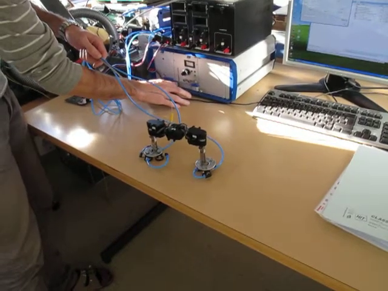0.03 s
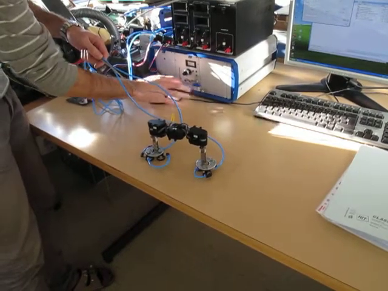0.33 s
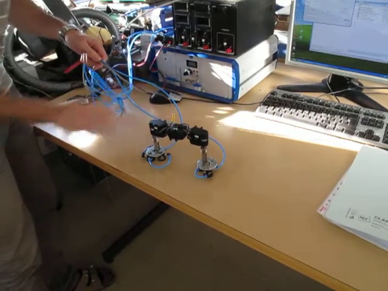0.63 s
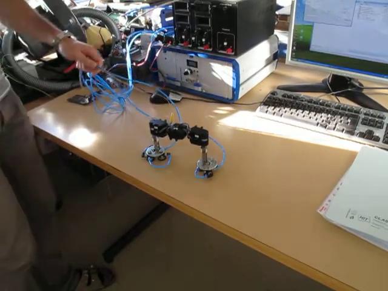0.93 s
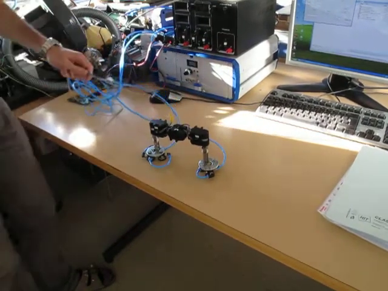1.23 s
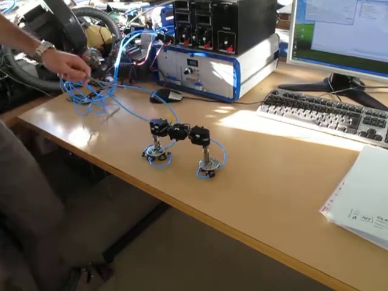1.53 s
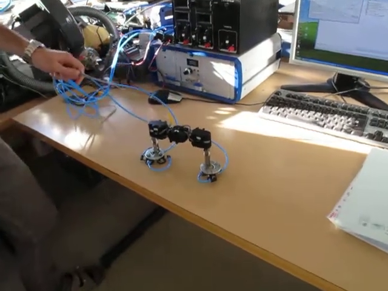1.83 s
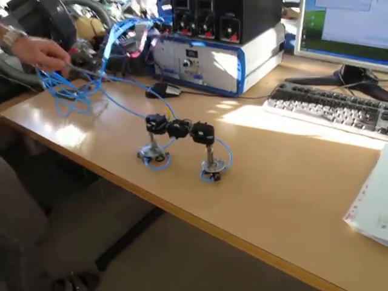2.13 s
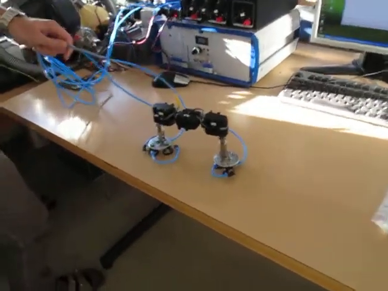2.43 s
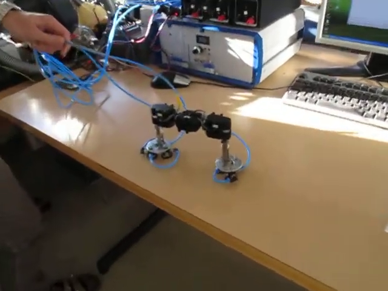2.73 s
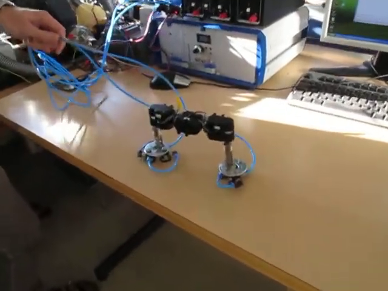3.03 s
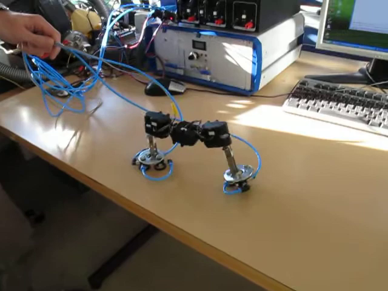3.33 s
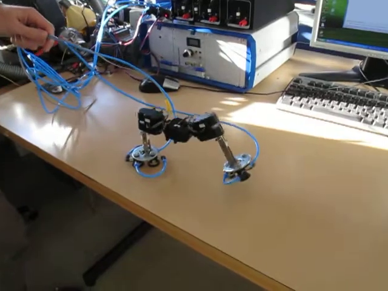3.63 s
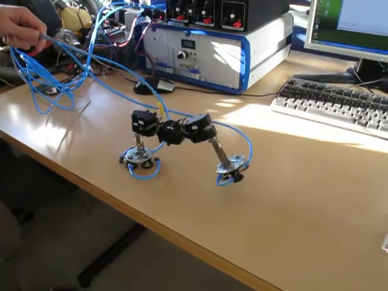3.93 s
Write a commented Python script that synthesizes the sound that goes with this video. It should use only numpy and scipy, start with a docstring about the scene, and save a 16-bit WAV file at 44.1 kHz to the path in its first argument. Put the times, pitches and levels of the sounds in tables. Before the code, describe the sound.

The steady, humming drone of a small vacuum pump fills a workroom, along with a high, whistling air hiss. A soft rustle comes first, then one small valve click. The pump's tones fade and return as the microphone drifts.

```python
"""A small vacuum pump drones steadily in a workroom while air hisses and whistles through a narrow leak.
The pump's spinning vanes make a stack of tones. The microphone drifts through the room's standing
waves (fixed loud and quiet spots), so these tones fade and return one by one. Something rustles softly,
a valve clicks once, and late on a brief audio dropout makes the tones jump, with a faint thump."""
import sys
import numpy as np
from scipy import signal
from scipy.fft import rfft, irfft
from scipy.io import wavfile
from scipy.ndimage import uniform_filter1d

SR = 44100
rng = np.random.default_rng(int(sys.argv[2]) if len(sys.argv) > 2 else 0)


def wav_out(sig):
    """Save sig, one row per channel (or a flat mono array), as 16-bit PCM at SR to the path in sys.argv[1]."""
    wavfile.write(sys.argv[1], SR, np.round(np.clip(np.atleast_2d(sig).T, -1, 1) * 32767).astype(np.int16))


N = 176400
T = np.arange(N) / SR
HZ = np.fft.rfftfreq(N, 1 / SR)
VANE_HZ, VANE_COUNT = 230.45, 5  # vanes passing per second, vanes on the shaft
DROPOUT_S = 3.4235


def amp(db):
    """Turns decibels into a gain."""
    return 10 ** (np.asarray(db) / 20)


def unit(x):
    """Scales a signal to an average (rms) level of 1."""
    return x / np.sqrt(np.mean(abs(x) ** 2) + 1e-20)


def bell(at_s, half_s):
    """A smooth rise to 1 at at_s, then a fall."""
    return np.exp(-((T - at_s) / half_s) ** 2)


def level_at(spectrum, hz):
    """Looks up a level between a table's pitches, on a log scale."""
    pitches, levels = np.transpose(spectrum)
    return np.interp(np.log(hz + 1), np.log(pitches + 1), levels)


def drift(rate_hz):
    """A smooth random wobble, up to about rate_hz."""
    return unit(irfft(rfft(rng.standard_normal(N)) * np.exp(-(HZ / rate_hz) ** 2), N))


def noise(spectrum, patchy_db=0):
    """Shaped noise; patchy_db makes its narrow bands swell and sink."""
    hz = np.fft.rfftfreq(1024, 1 / SR)
    real, imag, patches = rng.standard_normal((N // 256 + 5, len(hz), 3)).T
    patches = uniform_filter1d(patches, size=5, axis=0)  # smooth across pitch
    patches = unit(uniform_filter1d(patches, size=90, axis=1))  # and across time
    bands = (real + 1j * imag) * amp(level_at(spectrum, hz)[:, None] + patchy_db * patches)
    return unit(signal.istft(bands, nperseg=1024, noverlap=768)[1][:N])


def ringing_noise(hz, width_hz):
    """Noise that rings around one pitch."""
    return unit(irfft(rfft(rng.standard_normal(N)) / (1 + 2j * (HZ - hz) / width_hz) ** 2, N))


def mic_move(first_db, later_db, at_s=2.1, glide_s=.21):
    """The level glides as the microphone moves from one place to another."""
    return first_db + (later_db - first_db) * (.5 + .5 * np.tanh((T - at_s) / glide_s))


# Electrical and motor tones: pitch_hz, first_level_db, later_level_db
HUM_TONES = [(100, -72, -69.5), (119.9, -61.5, -60.5), (551, -57.5, -58), (790, -68, -56), (820, -72, -53),
             (1888, -60, -55), (2089, -59.5, -57.5), (2340, -61, -70), (2445, -53.5, -62)]


def motor_hum(wander_s=.00004):
    """Mains and motor tones waver; one beats against the ninth vane tone as a slight rattle."""
    out = np.zeros(N)
    for hz, first_db, later_db in HUM_TONES:
        db = mic_move(first_db, later_db) + .64 * drift(2.5)
        cycles = hz * (T + wander_s * drift(4.3)) + rng.random()
        out += amp(db) * np.sqrt(2) * np.cos(2 * np.pi * cycles)
    return out


# Typical level of each faint vane tone: pitch_hz, level_db
VANE_BUZZ = [(2700, -72), (3900, -65), (5200, -66), (6500, -73), (7400, -58.5), (9000, -57.5),
             (10400, -52.5), (11700, -66), (15500, -60)]
# Typical level of each shaft tone in between: pitch_hz, level_db
SHAFT_BUZZ = [(46, -73), (180, -78), (600, -72.5), (2900, -73.5), (3500, -68), (4100, -72), (5300, -67.5),
              (6000, -81.5), (8000, -72.5), (10400, -66.5), (11700, -76)]


def shaft_buzz(phase, fade_hz=.357, scatter_db=2.3):
    """The spinning shaft makes faint tones at multiples of its speed, each fading at random."""
    shaft_turn = np.exp(1j * phase / VANE_COUNT)
    tone, out = np.ones(N, complex), np.zeros(N)
    in_drone = [row[0] * VANE_COUNT for row in DRONE_TONES]
    slow_s = T[::100]
    for multiple in range(1, 300):
        tone = tone * shaft_turn  # step up to the next multiple
        rate, real, imag = rng.standard_normal((3, 6))
        fade = unit((real + 1j * imag) @ np.exp(2j * np.pi * fade_hz * rate[:, None] * slow_s))
        spectrum = SHAFT_BUZZ if multiple % VANE_COUNT else VANE_BUZZ
        db = level_at(spectrum, multiple * VANE_HZ / VANE_COUNT) + scatter_db * rng.standard_normal()
        if multiple not in in_drone:
            out += np.sqrt(2) * amp(db) * (np.repeat(fade, 100) * tone).real
    return out


# Tone colour of the exhaust air: pitch_hz, relative_db
EXHAUST_COLOUR = [(20, -12), (70, -15), (130, -20.5), (220, -6), (330, -12.5), (510, -3), (640, -3.5),
                  (830, -2.5), (1650, -4.5), (2000, -3), (2200, -10.5), (2430, -3.5), (2900, -10.5),
                  (3500, -5), (4100, -10.5), (4800, -8), (6300, -14.5), (9000, -17.5)]
# Pitches where the room rings: pitch_hz, width_hz, first_level_db, later_level_db
ROOM_RINGS = [(550, 73, -57.5, -69), (840, 215, -55.5, -53), (2027, 200, -55, -56)]


def exhaust(phase):
    """Air rushes out of the pump, puffing with each vane and making the room ring."""
    air = amp(-41.5) * noise(EXHAUST_COLOUR, patchy_db=1.9)
    for hz, width_hz, first_db, later_db in ROOM_RINGS:
        air += amp(mic_move(first_db, later_db)) * ringing_noise(hz, width_hz)
    return air * (1 + .095 * np.cos(phase))


# Soft brushes: middle_s, half_length_s, level_db
BRUSHES = [(.705, 0.054, -42.5), (0.855, 0.13, -41.7)]
# Their tone colour: pitch_hz, relative_db
BRUSH_COLOUR = [(800, -22), (3800, 1.5), (5500, 0), (9000, -14)]


def rustle():
    """Soft brushing, like a sleeve or tubing."""
    loudness = sum(amp(db) * bell(at_s, half_s) for at_s, half_s, db in BRUSHES)
    return loudness * noise(BRUSH_COLOUR)


# Tone colour of the click: pitch_hz, relative_db
CLICK_COLOUR = [(800, -20), (2700, -4), (3700, 3), (6000, 1.5), (11000, -18)]


def valve_click(start_s=2.5738, decay_s=.002, room_decay_s=.03):
    """A valve gives one small dry click that lingers faintly in the room."""
    age_s = np.maximum(T - start_s, 0)
    fade = np.exp(-age_s / decay_s) + amp(-21) * np.exp(-age_s / room_decay_s)
    return (T > start_s) * amp(-28.8) * noise(CLICK_COLOUR) * fade


def dropout_thump():
    """The faint thump of a brief audio dropout."""
    return amp(-39) * bell(DROPOUT_S, half_s=.0013)


# Tone colour of the hiss: pitch_hz, relative_db
HISS_COLOUR = [(3000, -46), (6800, -19), (7400, -4), (8300, -4), (9600, 1.5), (10800, -5.5), (11500, -10),
               (12800, -10), (13900, -17), (14400, -9), (15000, -5), (15600, -6)]
# Strength of the air flow: time_s, gain_db
AIR_FLOW = [(0, -3), (.7, -1.4), (2.3, -0.7), (3.1, 0), (4, -0.7)]
# Quick pulsing of the leak: rate_hz, depth_fraction
THROBS = [(230.45, .1), (138.27, .04), (92.18, .05), (100.1, .06), (38.7, .05), (7.8, .07)]
# Brief spurts of the whistle: middle_s, gain_db
WHISTLE_SPURTS = [(2.104, 9.5), (2.232, 12), (2.864, 8.5), (3.004, 7), (3.598, 11.5)]


def air_leak():
    """Air squeezes through a narrow gap with a throbbing hiss and a thin, fluttering whistle."""
    throb = 1 + sum(depth * np.cos(2 * np.pi * (hz * T + rng.random())) for hz, depth in THROBS)
    whistle = ringing_noise(hz=10450, width_hz=480)
    flutter = np.exp(.19 * drift(130))
    spurts_db = sum(db * bell(at_s, half_s=.0047) for at_s, db in WHISTLE_SPURTS)
    whistle = amp(-36 + spurts_db) * unit(whistle * flutter)
    hiss = amp(-35.5) * noise(HISS_COLOUR, patchy_db=2.1)
    flow_db = np.interp(T, *np.transpose(AIR_FLOW))
    return (hiss + whistle) * throb * amp(flow_db)


def vane_phase(wobble=.000396):
    """The angle of the vane cycle, turning at almost constant speed."""
    return 2 * np.pi * np.cumsum(VANE_HZ * (1 + wobble * drift(5.05))) / SR


# The pump's strong tones, each with its dip at a quiet spot in the room:
# vane_multiple, first_level_db, later_level_db, dip_time_s, dip_depth_db, dip_half_length_s
DRONE_TONES = [(1, -38.5, -38.5, 1.2, 0, .3), (2, -42.5, -42, 1.95, 4.5, 0.29),
               (3, -39, -34, 1.96, 18.5, 0.17), (4, -43, -53.5, 2.2, 4.5, 0.13),
               (5, -45.5, -42.5, 2.28, 9, 0.15), (6, -57.5, -50.5, 2.22, 18, .12),
               (7, -47.5, -42.5, 1.84, 25, 0.12), (8, -47.5, -51, 1.78, 17, 0.09),
               (9, -45, -47.5, 2.2, 11, 0.065), (10, -52.5, -51, 1.2, 7, 0.25),
               (11, -51, -73, 2.56, 2, 0.38), (13, -64, -61, 1.8, 4, 0.14), (14, -56, -54.5, 1.83, 8, 0.1),
               (15, -50.5, -56, 1.92, 2, 0.085), (16, -55, -51, 1.23, 9, 0.14),
               (18, -59.5, -57.5, 1.95, 1, 0.25), (21, -55, -57, 1.82, 13, 0.07),
               (23, -60, -65, 2.15, 17, 0.064)]
# More loud and quiet spots on the way: vane_multiple, middle_s, gain_db, half_length_s
ROOM_SPOTS = [(7, 1, -14, 0.27), (7, 2.66, -11, 0.23), (8, 2.25, 7, 0.3), (8, 1.38, 4, 0.13),
              (8, 1.02, -4, .14), (3, 1.15, 2, 0.26), (6, 1.85, 8.5, 0.33), (16, 2.54, 7, 0.23),
              (16, 2.86, -17, .1), (5, 1.29, 5, 0.16), (21, 1.52, 5.8, .34), (21, 2.1, -7, .1),
              (23, 2.21, 13.5, 0.36)]


def pump_drone(phase, jump_cycles=.347, jump_length_s=.004):
    """The vanes' tones dip and swell as the microphone moves; a brief audio dropout makes them jump."""
    out = np.zeros(N)
    jumped = np.clip((T - DROPOUT_S) / jump_length_s + .5, 0, 1)
    for multiple, first_db, later_db, dip_s, depth_db, dip_half_s in DRONE_TONES:
        dip_db = depth_db / (1 + ((T - dip_s) / dip_half_s) ** 2)
        spots_db = sum(gain_db * bell(at_s, half_s)
                       for which, at_s, gain_db, half_s in ROOM_SPOTS if which == multiple)
        db = mic_move(first_db, later_db, dip_s) - dip_db + spots_db
        angle = multiple * phase + 2 * np.pi * rng.random()
        before = np.cos(angle)
        after = np.cos(angle + 2 * np.pi * multiple * jump_cycles)
        out += amp(db) * np.sqrt(2) * ((1 - jumped) * before + jumped * after)
    return out


def scene():
    """Pump, leak and small noises, the same in both ears."""
    phase = vane_phase()
    pump = pump_drone(phase) + shaft_buzz(phase) + motor_hum() + exhaust(phase)
    mono = pump + air_leak() + rustle() + valve_click() + dropout_thump()
    return np.array([mono, mono])


def record(dry):
    """The microphone loses one narrow band of treble; then the highest treble is cut off."""
    notch_hz, notch_width_hz, top_hz = 11740, 450, 15720
    offset_hz = HZ - notch_hz
    notched = irfft(rfft(dry) * abs(offset_hz) / np.hypot(offset_hz, notch_width_hz / 2), N)
    lowpass = signal.firwin(1023, top_hz, window=("kaiser", 9), fs=SR)
    return signal.oaconvolve(notched, lowpass[None], "same")


dry = scene()
out = record(dry)
wav_out(out)
```